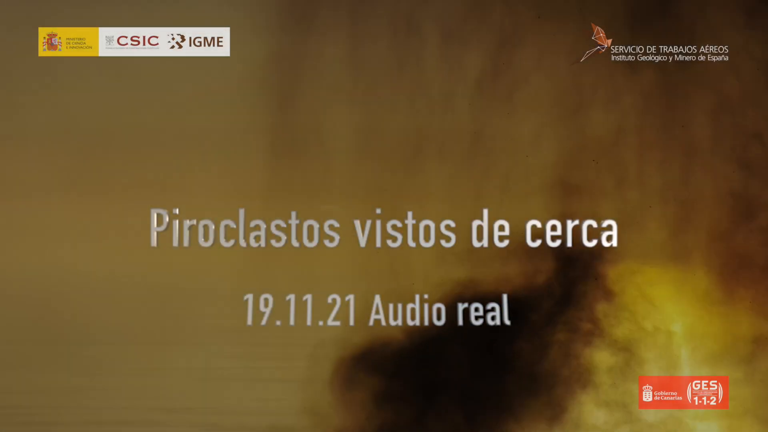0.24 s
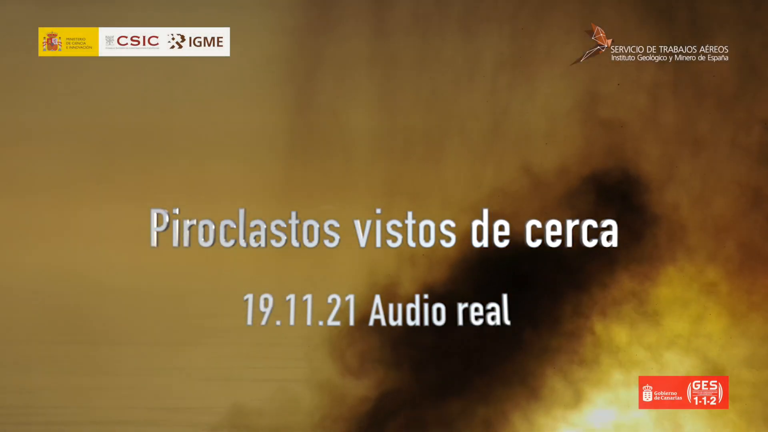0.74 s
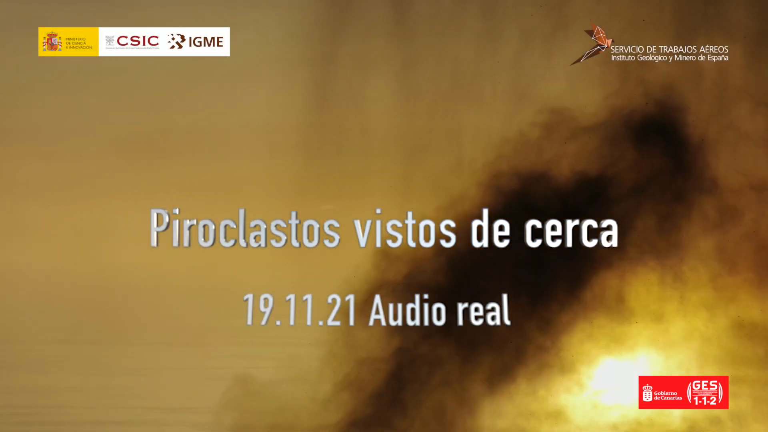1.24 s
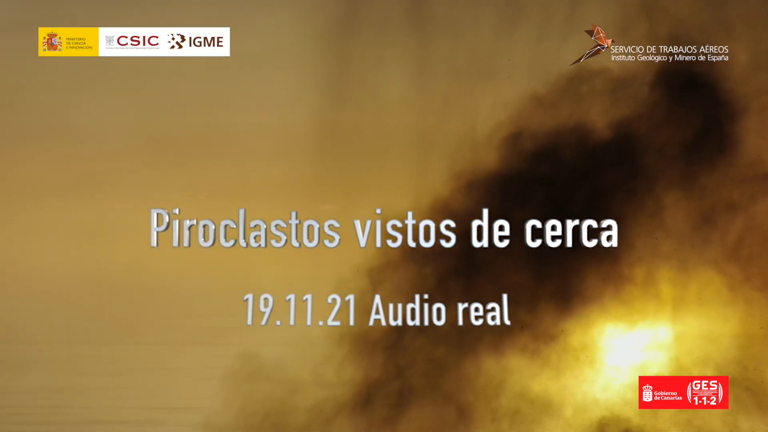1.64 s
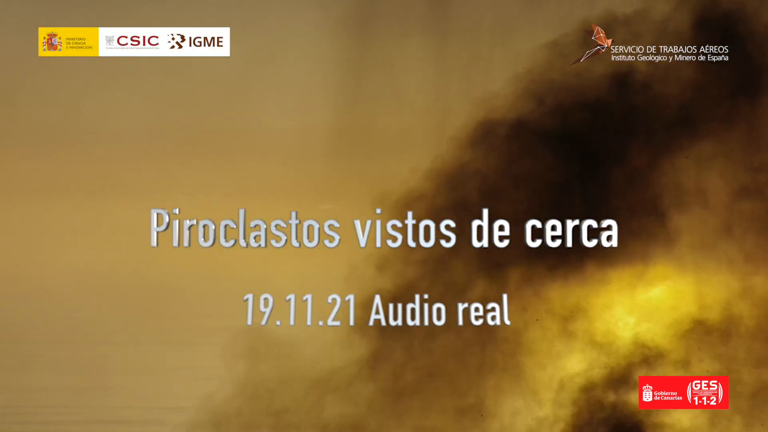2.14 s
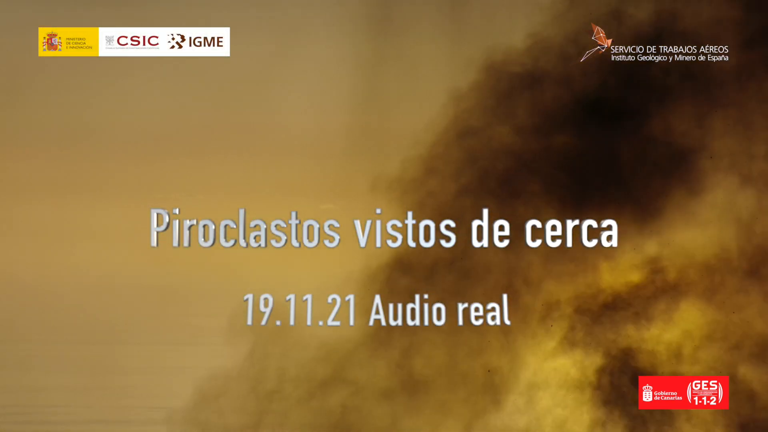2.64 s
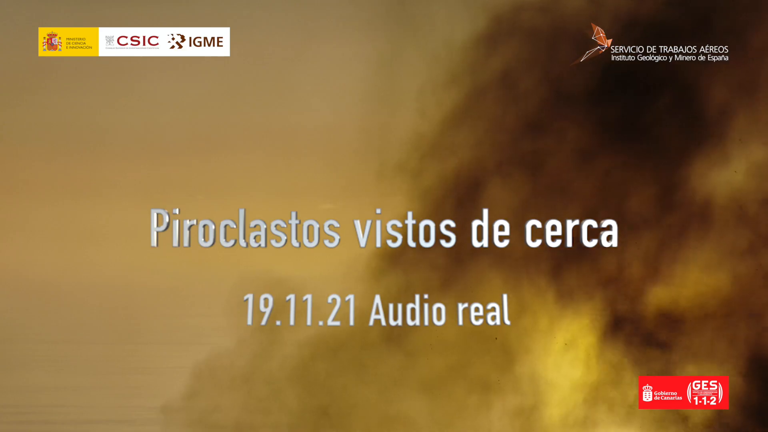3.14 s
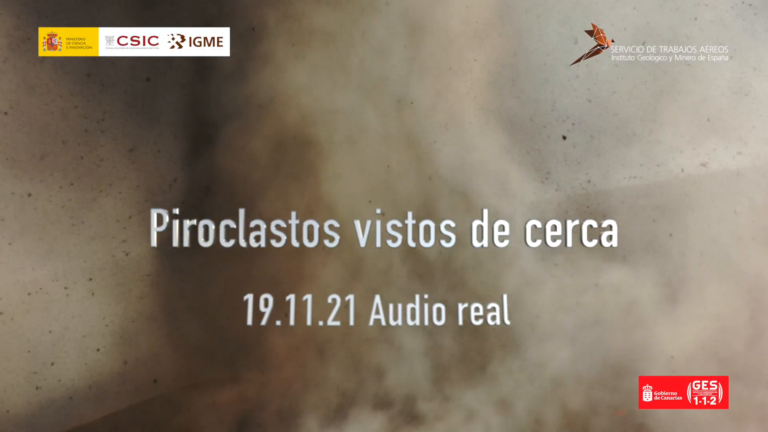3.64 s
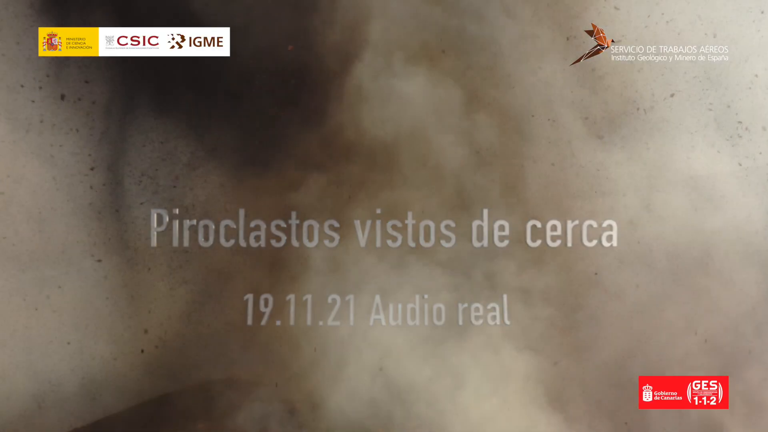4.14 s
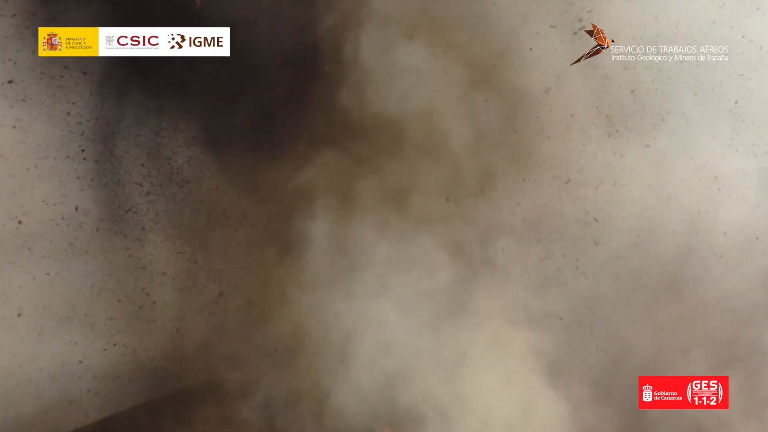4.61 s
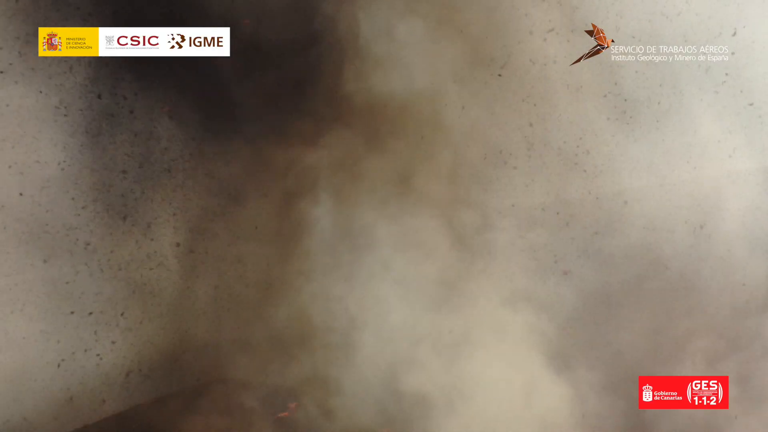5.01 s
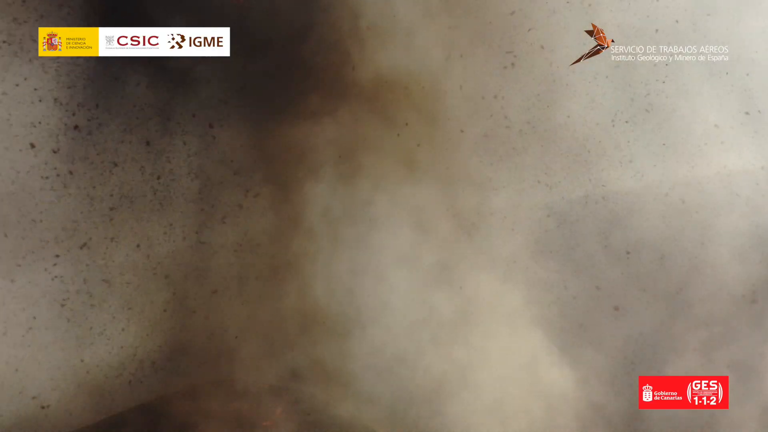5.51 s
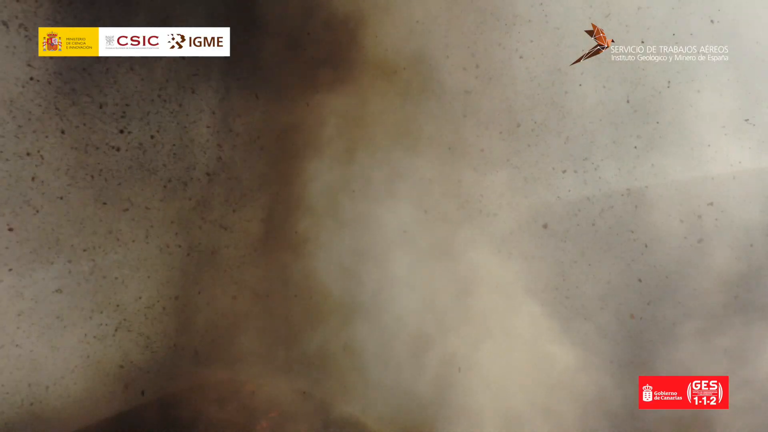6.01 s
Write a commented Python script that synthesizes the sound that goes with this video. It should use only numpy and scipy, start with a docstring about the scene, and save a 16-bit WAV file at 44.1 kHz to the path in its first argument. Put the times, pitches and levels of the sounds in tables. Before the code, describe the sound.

Dull gas-jet roar, two heavy low thumps and an overloaded rumbling blast around one second, then long roaring decay, tiny ash ticks and late wind.

```python
"""Distant volcanic vent

A vent is heard from far away over open ground: a deep rumble with thumps and a rushing gas jet.
Rumble and jet are shaped noise, dull because distance takes the treble off; a ground echo combs the jet.
Thumps are fading low tones, ash grains are short puffs of noise, and noise in each port makes the wind.
A soft hiss and a faint whine lie below. The loudest surges overload the recorder and crackle.
"""
import sys
import numpy as np
from scipy import signal
from scipy.fft import rfft, irfft
from scipy.io import wavfile

SR = 44100
rng = np.random.default_rng(int(sys.argv[2]) if len(sys.argv) > 2 else 0)


def nominal_scale(level):
    """Amplitude ratio for a level in decibels (scalar or array-like)."""
    x = np.asarray(level, float) / 20
    return 10 ** x


def output_pcm(signal):
    """Save a mono or channel-first signal as 16-bit PCM at the path in sys.argv[1].

    Samples are clipped to [-1, 1] before scaling.
    """
    pcm = np.clip(np.atleast_2d(signal).T, -1, 1) * 32767
    wavfile.write(sys.argv[1], SR, np.round(pcm).astype(np.int16))


N = 276066
TIME = np.arange(N) / SR
HZ = np.fft.rfftfreq(N, 1 / SR)


def rms_one(x):
    """Scales a sound to an average power of 1."""
    return x / np.sqrt(np.mean(x ** 2) + 1e-20)


def in_time(rows):
    """Joins the rows by straight lines: one value per sample for each column after the time."""
    seconds, *columns = np.transpose(rows)
    return [np.interp(TIME, seconds, column) for column in columns]


def at_hz(points):
    """Turns (Hz, dB) points into a gain at every frequency, joined on a log frequency axis."""
    hz, db = np.transpose(points)
    return nominal_scale(np.interp(np.log(HZ + 1), np.log(hz), db))


def drift(rate_hz):
    """Slow random wander with an rms of 1: noise smoothed by two equal low-pass stages."""
    every = 40  # the wander is drawn once per 40 samples
    settle = 2000  # drop the start, where the filter is still filling up
    pole = np.exp(-2 * np.pi * rate_hz * every / SR)
    noise = rng.standard_normal(N // every + 2 + settle)
    slow = signal.lfilter([1], [1, -2 * pole, pole * pole], noise)[settle:]
    return np.interp(np.arange(N) / every, np.arange(len(slow)), rms_one(slow))


# How much the two ports differ. Each row: frequency in Hz, side (difference) level over mid in dB.
SIDE_UNDER_MID = [(60, -40), (130, -30), (200, -21), (580, -19), (800, -25), (1300, -23), (2600, -26)]
# How the sound leans to one side. Each row: frequency in Hz, left over right in dB.
LEFT_OVER_RIGHT = [(60, 0), (210, -.3), (320, 1.4), (740, 1.4), (1130, .7), (2600, .3)]


def turbulence(spectrum, echo_gain, flutter_db, flutter_hz):
    """Far turbulent noise plus its later ground echo; both ports hear nearly the same."""
    echo_delay_s = 0.00191
    echo = echo_gain * np.exp(-2j * np.pi * HZ * echo_delay_s)
    mid, side = rfft(rng.standard_normal((2, N))) * at_hz(spectrum) * (1 + echo)
    side = side * at_hz(SIDE_UNDER_MID)
    lean = np.sqrt(at_hz(LEFT_OVER_RIGHT))  # half of the dB goes to each side
    left = (mid + side) * lean
    right = (mid - side) / lean
    pair = irfft(np.array([left, right]), N)
    return rms_one(pair) * nominal_scale(flutter_db * drift(flutter_hz))


# Tone colour of the two parts of the rumble. Each row: frequency in Hz, relative level in dB.
DEEP_SPECTRUM = [(10, -13.5), (20, -4.5), (40, -1.5), (65, -3.5), (90, -12.5), (130, -46), (260, -130)]
UPPER_SPECTRUM = [(20, -97.5), (45, -21), (75, -1), (130, -2), (170, -4), (215, -12), (280, -29),
                  (400, -45), (800, -130)]
# The rumble leaps up with the blast and dies away, the deepest part first.
# Each row: time in seconds, level of the deep part in dB, level of the upper part in dB.
RUMBLE_LEVELS = [(0, -37, -26.5), (.3, -29, -18), (.65, -23, -19.5), (.82, -16.5, -16.5), (.94, -19, -17),
                 (1.02, -8, -9), (1.3, -11, -10.5), (1.75, -14.5, -15), (2.2, -16, -12.5),
                 (2.6, -22, -14.5), (3.5, -27, -16), (3.95, -25.5, -18.5), (4.3, -32, -22.5),
                 (4.7, -43, -25), (5.25, -36, -38.5), (6.26, -30.5, -28)]


def rumble():
    """Churning lava and gas give low noise in two parts, each with its own surges."""
    deep_db, upper_db = in_time(RUMBLE_LEVELS)
    deep = turbulence(DEEP_SPECTRUM, 0, flutter_db=1.8, flutter_hz=6.2)
    upper = turbulence(UPPER_SPECTRUM, 0, flutter_db=-0.35, flutter_hz=16.0)
    return nominal_scale(deep_db) * deep + nominal_scale(upper_db) * upper


# Tone colour of the roar and of its top. Each row: frequency in Hz, relative level in dB.
ROAR_SPECTRUM = [(70, -91.5), (150, -18.5), (280, -9.5), (500, -2.5), (1050, -5), (1300, -6.5), (1600, -17),
                 (2100, -42), (4000, -130)]
TOP_SPECTRUM = [(500, -89.5), (1000, -23), (1400, -4.5), (1800, 1), (2050, -6.5), (2600, -12), (3050, -24),
                (3600, -34.5), (4200, -45.5), (5500, -76.5), (9000, -120)]
# The jet surges and fades.
# Each row: time in seconds, level of the roar in dB, level of the top of the roar in dB.
JET_LEVELS = [(0, -17.5, -31), (.6, -17, -30), (.8, -12.5, -22.5), (1.25, -14.5, -24.5), (1.6, -12, -22),
              (2.15, -11.5, -21), (2.3, -12.5, -21.5), (2.8, -11, -21), (3.2, -12, -21.5),
              (3.5, -11, -20.5), (4.25, -14.5, -22.5), (4.7, -16.5, -27), (5.8, -18.5, -30),
              (5.88, -20.5, -31.5), (6.26, -14, -27)]


def gas_jet():
    """Gas rushing out makes a turbulent roar, and the ground echo combs it."""
    roar_db, top_db = in_time(JET_LEVELS)
    roar = turbulence(ROAR_SPECTRUM, 0.22, flutter_db=0.6, flutter_hz=16.0)
    # the echo loses its order higher up, so it is weaker here
    top = turbulence(TOP_SPECTRUM, 0.026, flutter_db=0.61, flutter_hz=13.0)
    return nominal_scale(roar_db) * roar + nominal_scale(top_db) * top


# Gas bursts. Each row: start in seconds, level in dB before the ringing fades, pitch in Hz.
GAS_BURSTS = [(.678, -3, 84), (.988, -4, 59)]


def thumps():
    """Each burst of gas is a pressure step that rings out in a few low cycles."""
    out = np.zeros(N)
    sharpness = 2.0  # the Q of the ringing: higher rings for more cycles
    t = np.arange(SR // 4) / SR
    for start, level_db, hz in GAS_BURSTS:
        fade = np.exp(-np.pi * t * hz / sharpness)
        ring = nominal_scale(level_db) * np.sin(2 * np.pi * hz * t) * fade
        out[round(start * SR):][:len(t)] += ring
    low_pass = signal.butter(4, 300, fs=SR, output="sos")
    return signal.sosfilt(low_pass, out)


# The clearest ash grains landing.
# Each row: time in seconds, strength in dB before noise and filter, left over right in dB.
CLEAR_GRAINS = [(0.2578, -31, -2.0), (0.6409, -32, -0.5), (0.6898, -30, 0.0), (4.1155, -33, -5.0),
                (4.155, -36, -2.0), (4.8633, -31, 0.0), (4.8778, -26, -1.5), (5.0345, -34, 4.0),
                (5.2989, -36, -0.5), (5.477, -36, -0.5)]


def ash_grains():
    """Grains landing nearby make dry ticks: short bright puffs, a few clear ones over many faint ones."""
    per_s = 25.0  # faint grains per second in each channel
    faintest_db, ring_s = -45.0, 0.0004
    lands = rng.random((2, N)) < per_s / SR
    extra_db = 4.0 * np.minimum(rng.exponential(1, (2, N)), 3)
    hits = lands * nominal_scale(faintest_db + extra_db)
    for start, strength_db, pan_db in CLEAR_GRAINS:
        hits[:, round(start * SR)] += nominal_scale(strength_db + np.array([pan_db, -pan_db]) / 2)
    decay = np.exp(-1 / (ring_s * SR))
    envelope = signal.lfilter([1], [1, -decay], hits + 1e-18)
    puffs = envelope * rng.standard_normal(N)
    high_pass = signal.butter(2, 6000, "high", fs=SR, output="sos")
    return signal.sosfilt(high_pass, puffs)


def own_noise(spectrum):
    """Shaped noise that is unrelated in the two channels."""
    return rms_one(irfft(rfft(rng.standard_normal((2, N))) * at_hz(spectrum), N))


# Tone colour of the wind. Each row: frequency in Hz, relative level in dB.
WIND_SPECTRUM = [(10, -4), (30, 0), (80, -2), (140, -15), (300, -35), (600, -60), (1500, -130)]
# The wind comes and goes, strongest late on. Each row: time in seconds, level in dB.
WIND_LEVEL = [(0, -54.5), (2.6, -51.5), (2.95, -36), (3.4, -54), (4.3, -40), (4.75, -42), (4.85, -27.5),
              (5.35, -30.5), (5.5, -19.5), (5.85, -16), (6.0, -26.5), (6.26, -14)]


def wind():
    """Wind buffets each microphone port on its own, as low noise with an uneven level."""
    (level_db,) = in_time(WIND_LEVEL)
    gusts_db = 1.0 * np.array([drift(7.0), drift(7.0)])
    return nominal_scale(level_db + gusts_db) * own_noise(WIND_SPECTRUM)


# Tone colour of the hiss. Each row: frequency in Hz, relative level in dB.
HISS_SPECTRUM = [(1500, -20), (3000, 4), (5000, 3), (8500, -2), (11000, .5), (13000, 2), (15500, 2),
                 (20000, 2)]
# The hiss is lowest while the vent is loud. Each row: time in seconds, level in dB.
HISS_LEVELS = [(0, -50), (.8, -50.5), (1.2, -53), (2.4, -55), (3.9, -51), (5.3, -49), (5.8, -51),
               (6.26, -50.5)]


def hiss():
    """Soft bright noise, unrelated in the two channels, that follows its own level table."""
    (level_db,) = in_time(HISS_LEVELS)
    return nominal_scale(level_db) * own_noise(HISS_SPECTRUM)


def whine():
    """Faint steady tone of the recorder: one high sine."""
    hz, rms_db = 15092, -86.5
    return nominal_scale(rms_db) * np.sqrt(2) * np.sin(2 * np.pi * hz * TIME)


def scene():
    """Vent far ahead, ash and wind at the microphone, hiss and whine underneath."""
    vent = rumble() + gas_jet()
    return vent + thumps() + ash_grains() + wind() + hiss() + whine()


def band_limit(x):
    """A steep low-pass at the top of the band."""
    return signal.sosfilt(signal.butter(12, 15800, fs=SR, output="sos"), x)


def record(dry):
    """The recorder overloads at full scale: louder peaks are cut flat, which crackles."""
    full_scale = 1.0
    mix = np.clip(dry, -full_scale, full_scale)
    return band_limit(mix)


dry = scene()
out = record(dry)
output_pcm(out)
```